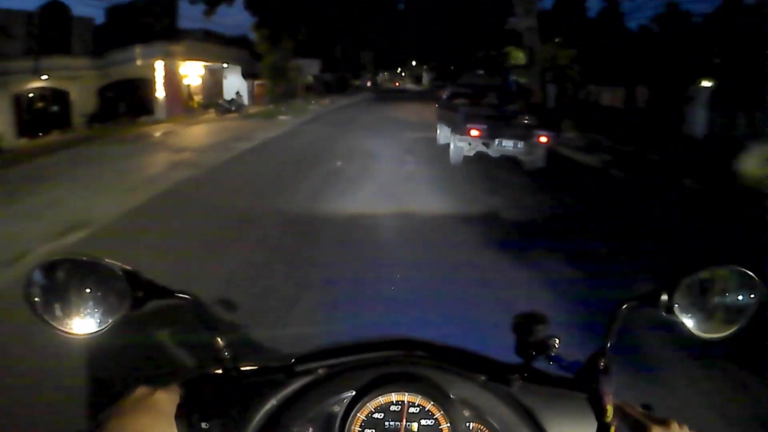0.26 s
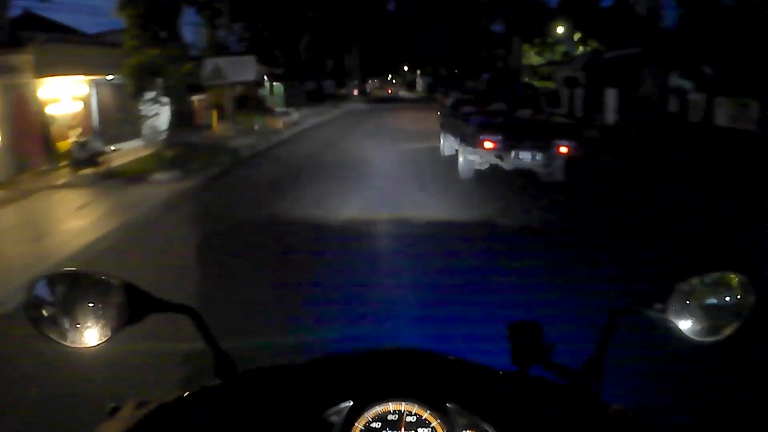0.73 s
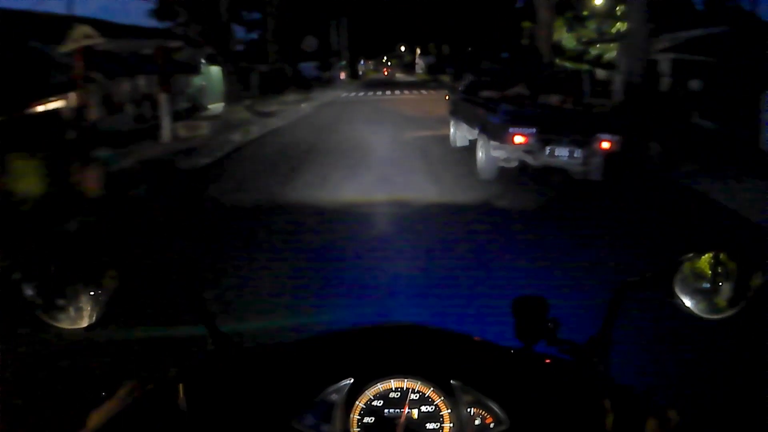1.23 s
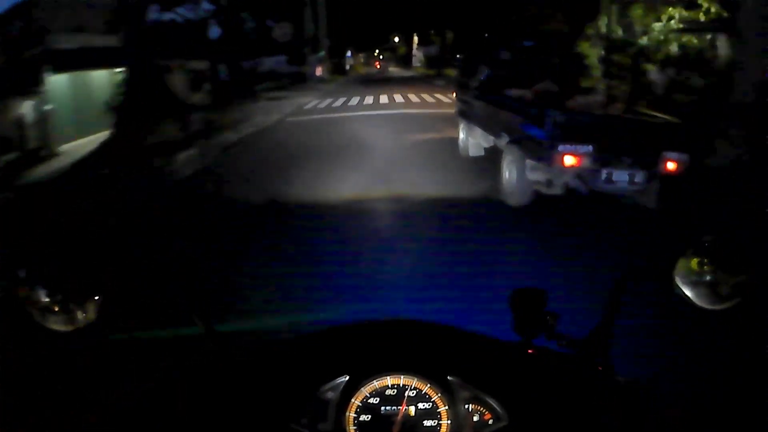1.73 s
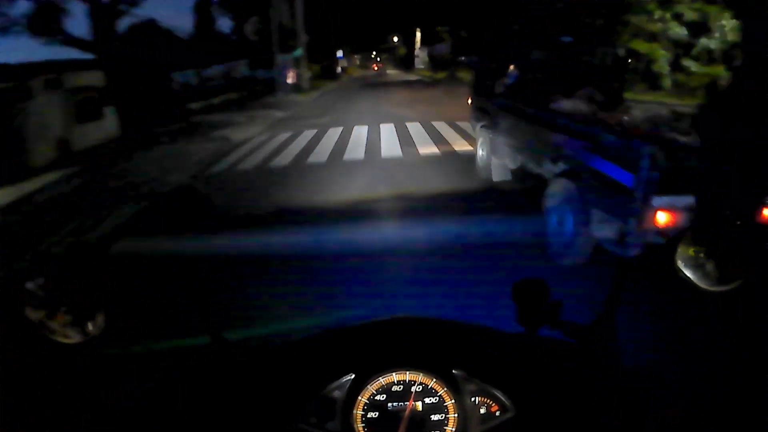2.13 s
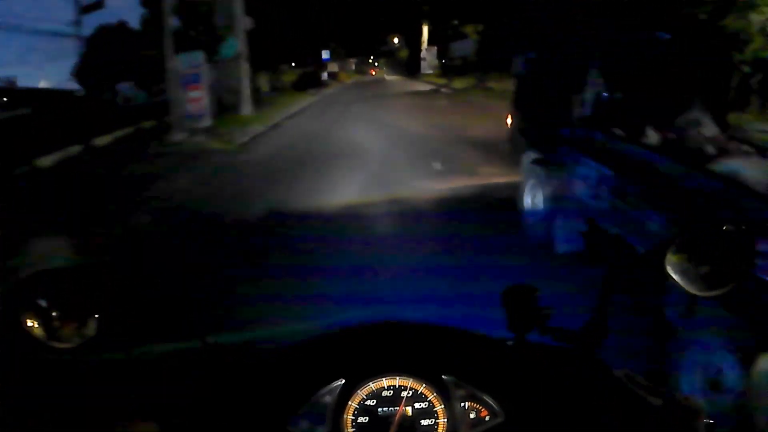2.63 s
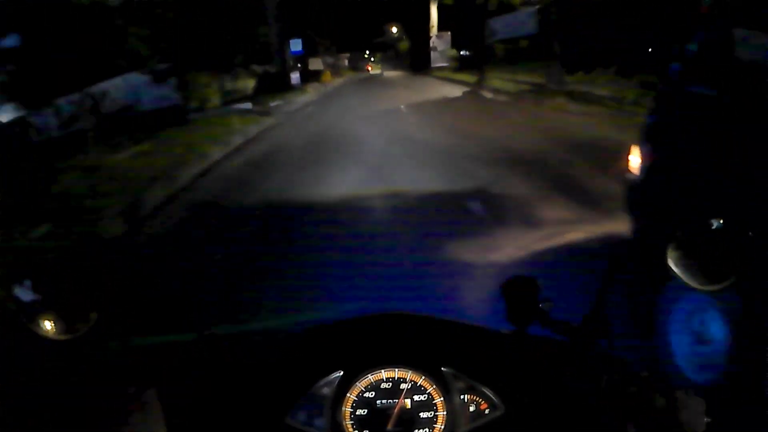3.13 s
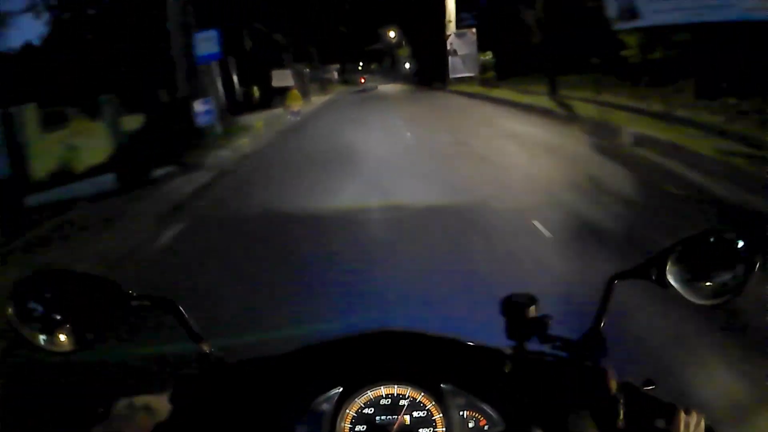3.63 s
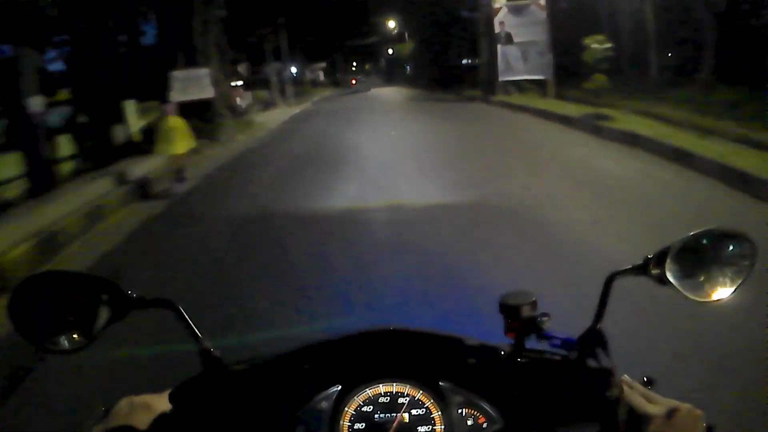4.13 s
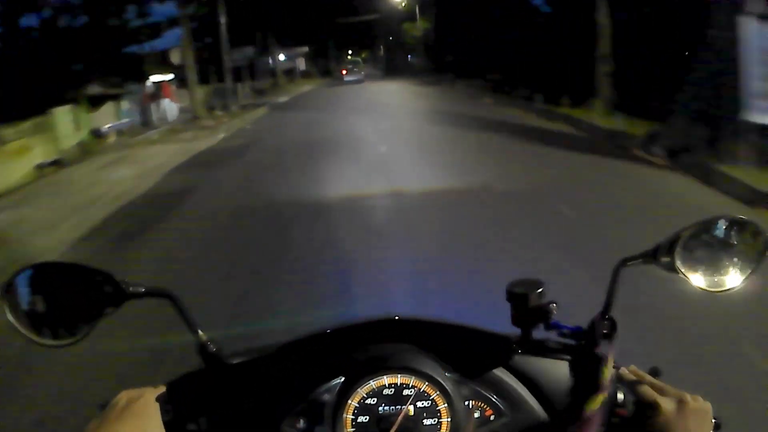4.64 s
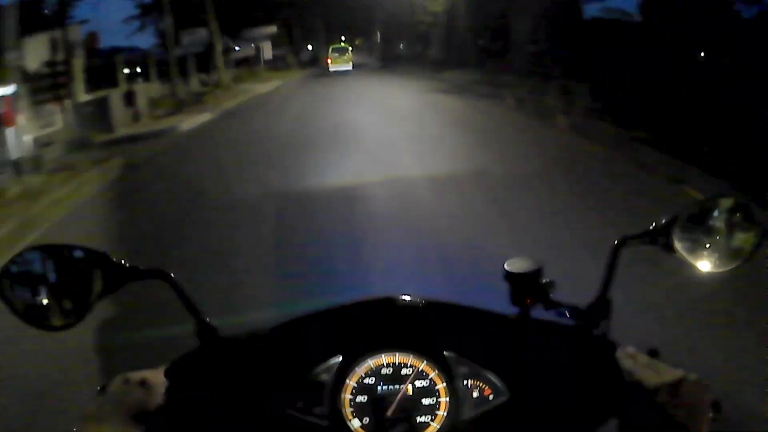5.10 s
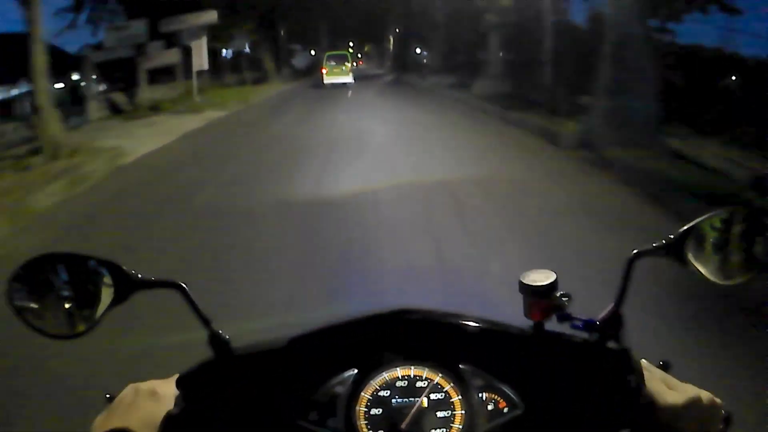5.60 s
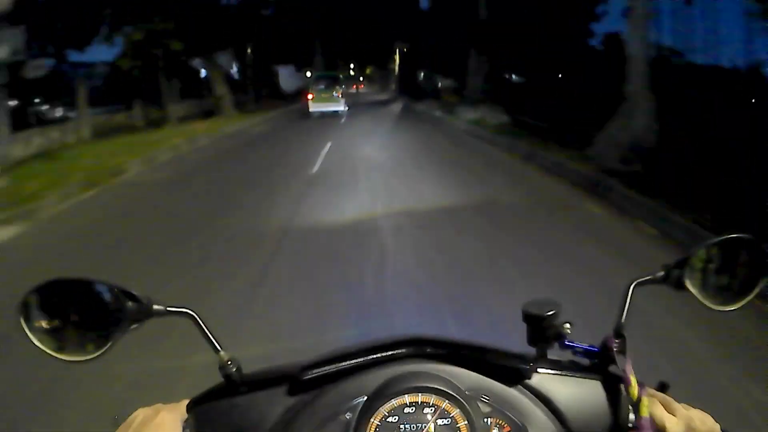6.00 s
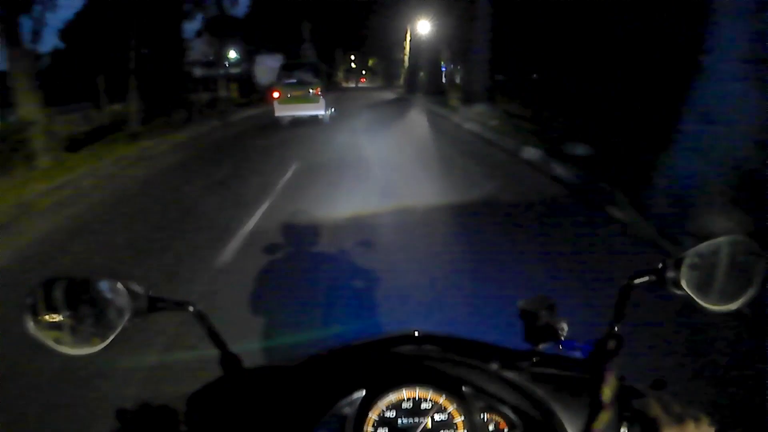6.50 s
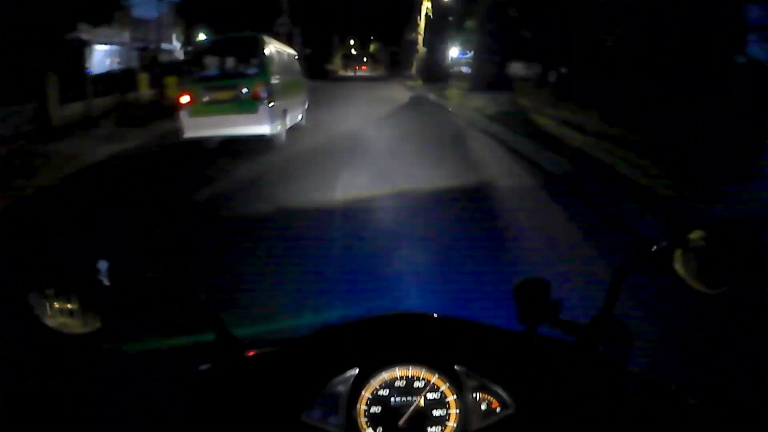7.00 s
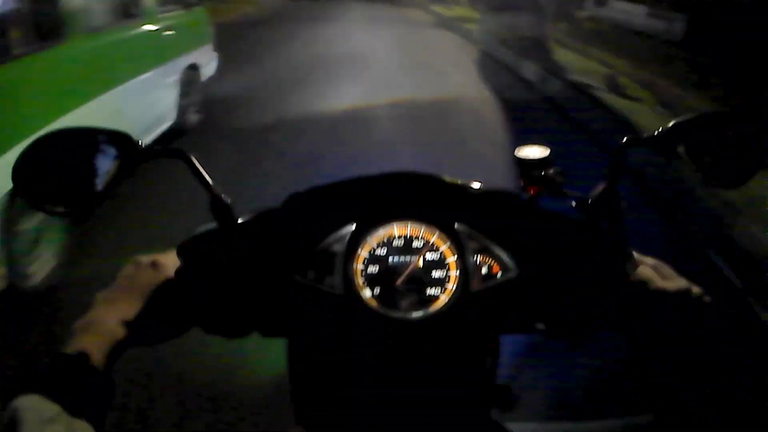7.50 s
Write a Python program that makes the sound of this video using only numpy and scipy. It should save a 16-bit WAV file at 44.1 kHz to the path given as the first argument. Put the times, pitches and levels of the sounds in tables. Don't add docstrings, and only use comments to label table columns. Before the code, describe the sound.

A small scooter engine buzzes continuously at high revs, rising slightly in the first second and then holding almost steady. Low wind buffeting thumps and flutters against a handlebar microphone, growing slowly. Around three to four seconds, gritty tyre hiss from a vehicle alongside swells quickly and drops away. The open road sound is close, dull on top and slightly tubular.

```python
import sys
import numpy as np
from scipy import signal
from scipy.io import wavfile
from scipy.ndimage import uniform_filter1d

SR = 44100
rng = np.random.default_rng(int(sys.argv[2]) if len(sys.argv) > 2 else 0)


def inscribe(sig):
    pcm = np.round(np.clip(np.atleast_2d(sig).T, -1, 1) * 32767)
    wavfile.write(sys.argv[1], SR, pcm.astype(np.int16))


def volts_from_decibels(level):
    exponent = np.asarray(level, float) / 20
    return 10 ** exponent


N = 341775

CRUISE_PER_S = 73.0
TUBE_SAMPLES, TUBE_ECHO = 64, .85


def firing_rate():
    # time in seconds, firings per second.
    speed = [(0, 68.5), (.06, 69.2), (.25, 70.55), (.5, 71.75), (.8, 72.65), (1.15, 73.3), (1.7, 72.2),
             (2.3, 71.35), (3.2, 71.95), (4.05, 73.78), (4.7, 73.38), (5.3, 72.62), (6.0, 73.33),
             (6.3, 73.05), (6.7, 72.86), (6.9, 73.1), (7.2, 73.65), (7.75, 74.15)]
    return in_time(speed)[0]


def over_cruise():
    return firing_rate() - CRUISE_PER_S


def belt_boom():
    # time in seconds, boom in dB.
    belt = [
        (0, -7),
        (.6, -9),
        (1.2, -6.5),
        (1.8, -1),
        (2.4, -0.5),
        (3.5, 2),
        (5.6, 0.5),
        (7.2, 2),
        (7.75, 1.5),
    ]
    return in_time(belt)[0]


def exhaust(cycles):
    # multiple of the firing rate, level in dB.
    orders = [(1, -12), (2, 0), (3, -2.5), (4, -8.5), (5, 0.5), (6, -13), (7, -3), (8, -9.5), (9, -20.5),
              (10, -27), (11, -18.5), (12, -16), (13, -19), (14, -8), (15, -15), (16, -48), (17, -22.5),
              (18, -24.5), (19, -17), (20, -27), (21, -21), (22, -28), (23, -29.5), (24, -22.5), (25, -53),
              (26, -22), (27, -30), (28, -25), (29, -23), (30, -39.5)]
    boom_share = {2: -0.27, 6: 0.74, 7: 0.27, 11: 0.48, 12: 0.59, 13: 0.91, 17: 0.46, 26: .6}
    standing_share = 0.77
    revs, boom_db = over_cruise(), belt_boom()
    level_db = -19.5 + 0.25 * revs
    bright_db = -1.65 + 0.53 * revs
    slide = 1 + revs / CRUISE_PER_S
    shaken = cycles + .0015 * drift(15)
    firing_hz = np.diff(cycles).mean() * SR
    strength = uneven(cycles, spread_db=1.0)

    def tone(order):
        return np.cos(2 * np.pi * (order * shaken - order_lag(order, firing_hz)))

    pulses = 0
    for order, order_db in orders:
        tilt_db = bright_db * max(np.log2(order / 5), 0) + boom_db * boom_share.get(order, 0)
        if order > 12:
            standing_db = np.interp(order * slide, *np.transpose(orders))
            tilt_db += standing_share * (standing_db - order_db)
        wobble_db = (1 + .03 * order) * drift(5)
        punch = strength if order > 9 else 1
        pulses = pulses + punch * volts_from_decibels(order_db + tilt_db + wobble_db) * tone(order)

    rasp = sum(volts_from_decibels(0.53 * drift(1.3)) * tone(order) for order in range(33, 46))
    rasp_db = -58 - .6 * boom_db
    return np.sqrt(2) * (volts_from_decibels(level_db) * pulses + volts_from_decibels(rasp_db) * tube(strength * rasp))


def order_lag(order, firing_hz):
    if order <= 9:
        return 0.036 * order * (order % 3 == 0) - 0.39 * (order == 1)
    round_trip = np.exp(-2j * np.pi * order * firing_hz * TUBE_SAMPLES / SR)
    sweep = .0045 * max(order - 20, 0) ** 2
    return .5 + 0.0784 * order + sweep + np.angle(1 + TUBE_ECHO * round_trip) / (2 * np.pi)


def uneven(cycles, spread_db):
    strength_db = spread_db * rng.standard_normal(int(cycles[-1]) + 3)
    each_sample_db = strength_db[(cycles + .35).astype(int)]
    return volts_from_decibels(uniform_filter1d(each_sample_db, size=90))


def exhaust_puff(cycles):
    # frequency in Hz, level in dB per Hz.
    puff_colour = [(700, -13), (900, -6.5), (1040, 2), (1200, -8), (1500, -0.5), (1800, -7), (2050, -5.5),
                   (2500, -8.5), (3000, -17.5), (3600, -19.5)]
    puff_db = -36 + 0.2 * over_cruise() + jolt_dip()
    puff = coloured(rng.standard_normal((2, N)), puff_colour, patchy_db=0.1, patch_rate=26)
    burst = gate(cycles, centre=.08, depth_db=7, sharp=2.5) * uneven(cycles, spread_db=.8)
    return volts_from_decibels(puff_db) * burst * puff


def narrow_hum():
    return volts_from_decibels(-40 + 1.5 * drift(10)) * narrow(hz=1038, width_hz=120)


def cowl():
    whistle_db = -52 - .25 * belt_boom() + jolt_dip() + 2.5 * drift(3.6)
    return volts_from_decibels(whistle_db) * narrow(hz=3124, width_hz=35)


def wind():
    # frequency in Hz, level in dB per Hz.
    buffet_colour = [(22, -6.5), (34, -15.5), (44, -24.5), (52, -11.5), (62, -13.5), (85, -2), (115, -0.5),
                     (320, -1.5), (400, -6.5), (520, -20), (800, -40.5)]
    # frequency in Hz, level in dB per Hz.
    edge_colour = [(250, -11), (380, 3), (460, -10), (600, -5), (850, -10.5), (1200, -19), (2000, -38)]
    # time in seconds, buffet lift in dB, edge lift in dB.
    gusts = [(.02, 7.5, 3), (.56, 5, 0.5), (.75, 5.5, 4), (1.12, 5, 4.5), (1.95, 4, 5.5), (2.02, 8.5, 7),
             (2.15, 6, 4), (2.27, 8, 3), (2.52, 6.5, 5), (2.78, 5.5, 2), (2.94, 5, 6.5), (3.13, 5.5, 7.5),
             (3.89, 5.5, 3), (4.12, 7, 3), (4.47, 2, 5.5), (4.68, 5.5, 1.5), (4.96, 4.5, 4.5),
             (5.22, 1.5, 0.5), (5.44, 8, 2.5), (5.74, 2, 3), (6.04, 4, 0), (6.3, 5, 2), (6.6, 0, 2.5),
             (6.76, 5, 4.5), (7.11, 3, 3.5), (7.36, 5, -1), (7.64, 4.5, 1.5)]
    rise_db = 0.73 * np.arange(N) / SR + 1.5 * drift(5.5)
    buffet_lift_db, edge_lift_db = bumps(gusts, width_s=0.035)
    buffet_db = -25.5 + rise_db + buffet_lift_db
    edge_db = -29.5 + 0.39 * rise_db + edge_lift_db

    buffet = coloured(rng.standard_normal((2, N)), buffet_colour, patchy_db=1.2, patch_rate=12)
    edge = coloured(rng.standard_normal((2, N)), edge_colour, patchy_db=1.2, patch_rate=12)
    below = signal.sosfiltfilt(signal.butter(2, 560, fs=SR, output="sos"), edge)
    edge = below + volts_from_decibels(.7 * (edge_db + 27)) * (edge - below)
    return volts_from_decibels(buffet_db + 1.9) * buffet + volts_from_decibels(edge_db - 2.16) * edge


def car():
    # frequency in Hz, level in dB per Hz.
    tyre_colour = [(1500, -17.5), (2200, -2.5), (3200, -3), (4200, -11.5), (5200, -7), (6200, -13.5),
                   (7000, -20), (7300, -22.5), (7600, -47.5)]
    hit = rng.random(N) < 700 / SR
    size = volts_from_decibels(4.5 * np.minimum(rng.exponential(1, N), 4))
    clicks = hit * size * rng.choice([-1, 1], N)
    white = 0.66 * rng.standard_normal((2, N)) + 0.25 * rms_one(clicks)
    hiss = coloured(white, tyre_colour, patchy_db=1.2, patch_rate=15)
    return volts_from_decibels(passing() + .8 * drift(20)) * hiss


def passing():
    level_s, left_s = 3.07, 3.92
    t = np.arange(N) / SR
    near, gone = np.maximum(level_s - t, 0), np.maximum(t - left_s, 0)
    return -39.5 - 145.5 * near - 68.5 * gone


def road_hiss(cycles):
    # frequency in Hz, level in dB per Hz.
    road_colour = [(2200, -7), (2700, -5), (3100, -4.5), (3500, -4.5), (4200, -6), (5500, -10),
                   (6300, -19.5), (7000, -22.5), (7400, -30), (7700, -40)]
    road_db = -46.5 - 0.23 * np.arange(N) / SR + jolt_dip()
    road = coloured(rng.standard_normal((2, N)), road_colour, patchy_db=1.2, patch_rate=15)
    return volts_from_decibels(road_db + 3.0) * gate(cycles, centre=0.38, depth_db=4.5, sharp=1.9) * road


def jolt_dip():
    # time in seconds, dip in dB.
    jolts = [
        (2.55, -2.5),
        (5.22, -3.5),
        (6.37, -3),
    ]
    return bumps(jolts, width_s=0.026)[0]


def tube(x):
    share = .17
    loop = np.zeros(TUBE_SAMPLES + 1)
    loop[0], loop[-1] = 1, TUBE_ECHO
    return (1 - share) * x + share * signal.lfilter([1], loop, x)


def rms_one(x):
    return x / np.sqrt(np.mean(x ** 2) + 1e-20)


def in_time(rows):
    s, *columns = np.transpose(rows)
    return [np.interp(np.arange(N) / SR, s, c) for c in columns]


def bumps(rows, width_s):
    s, *heights = np.transpose(rows)
    t = np.arange(0, N + 64, 64) / SR
    bells = np.exp(-.5 * ((t - s[:, None]) / width_s) ** 2)
    return [np.interp(np.arange(N) / SR, t, h @ bells) for h in heights]


def drift(rate):
    r = np.exp(-80 * np.pi * rate / SR)
    slow = signal.lfilter([1], [1, -2 * r, r * r], rng.standard_normal(N // 40 + 2002))
    slow = slow[2000:]
    return np.interp(np.arange(N) / 40, np.arange(len(slow)), rms_one(slow))


def coloured(white, spectrum, patchy_db, patch_rate):
    hz, level_db = np.transpose(spectrum)
    edges = hz[0] * 2 ** np.arange(-1 / 6, np.log2(hz[-1] / hz[0]) + 1 / 3, 1 / 3)
    out = 0
    for k, (low, high) in enumerate(zip(edges, edges[1:])):
        band_filter = signal.butter(2, [low, high], "band", fs=SR, output="sos")
        band = signal.sosfilt(band_filter, white[k % 2])
        band_db = np.interp(np.log(low * high) / 2, np.log(hz), level_db)
        out = out + volts_from_decibels(band_db + patchy_db * drift(patch_rate)) * band
    return rms_one(out)


def narrow(hz, width_hz):
    r = np.exp(-np.pi * width_hz / SR)
    poles = [1, -2 * r * np.cos(2 * np.pi * hz / SR), r * r]
    once = signal.lfilter([1, 0, -1], poles, rng.standard_normal(N))
    return rms_one(signal.lfilter([1], poles, once))


def gate(cycles, centre, depth_db, sharp):
    swell = (1 + np.cos(2 * np.pi * (cycles - centre))) / 2
    return rms_one(volts_from_decibels(depth_db * swell ** sharp))


def scene():
    cycles = .7 + np.cumsum(firing_rate()) / SR
    engine = exhaust(cycles) + cowl() + narrow_hum()
    through_tube = tube(exhaust_puff(cycles) + road_hiss(cycles) + car())
    return (engine + wind() + through_tube)[None]


def drop_faint(x, floor_db, rise_db):
    frames = signal.stft(x, nperseg=2048)[2][:, :1024]
    power = (np.abs(frames) ** 2).reshape(1, 128, 8, -1).mean(axis=2)
    khz = np.arange(128)[:, None] * SR / 256000
    faint = volts_from_decibels(2 * (floor_db + rise_db * np.clip(khz - 7, 0, 1)))
    heard = (power > faint) | (khz > 8)
    kept = frames * np.repeat(heard, 8, axis=1)
    return signal.istft(np.pad(kept, [(0, 0), (0, 1), (0, 0)]), nperseg=2048)[1][:, :N]


def top_cut(x):
    return signal.sosfilt(signal.butter(12, 7740, fs=SR, output="sos"), x)


def record(dry):
    r = np.exp(-1 / (.013 * SR))
    power = signal.lfilter([1 - r], [1, -r], dry ** 2, zi=[[.04]])[0]
    level_db = 10 * np.log10(power + 1e-9)
    ducked = dry * volts_from_decibels(-.3 * (level_db + 13.5))
    mix = drop_faint(np.tanh(ducked), floor_db=-85.0, rise_db=12)
    return top_cut(mix)


dry = scene()
out = record(dry)
inscribe(out)
```